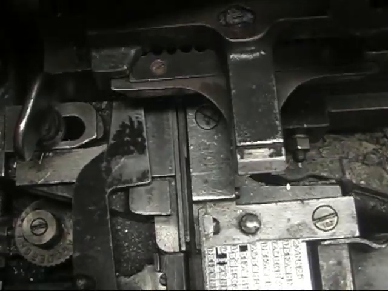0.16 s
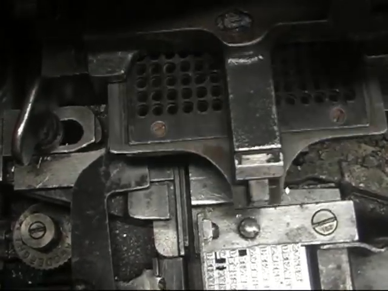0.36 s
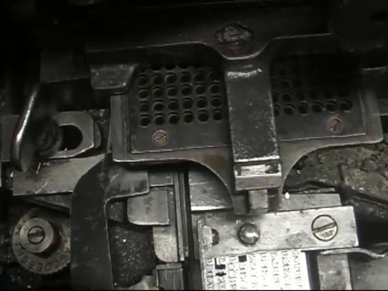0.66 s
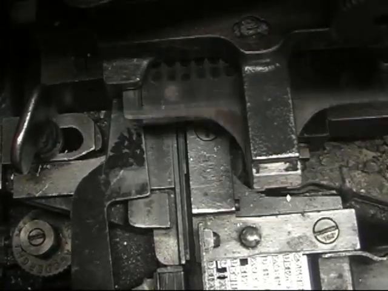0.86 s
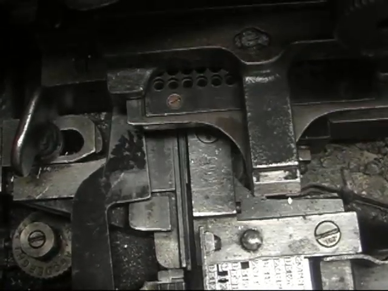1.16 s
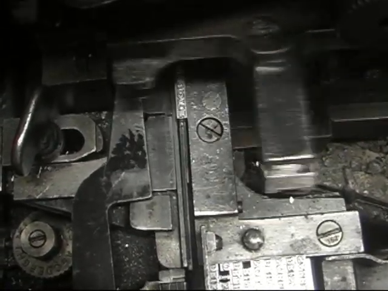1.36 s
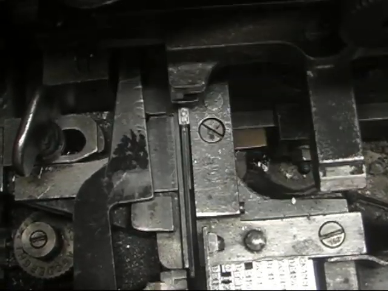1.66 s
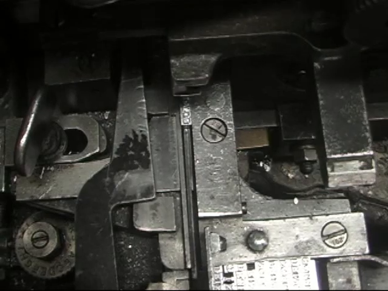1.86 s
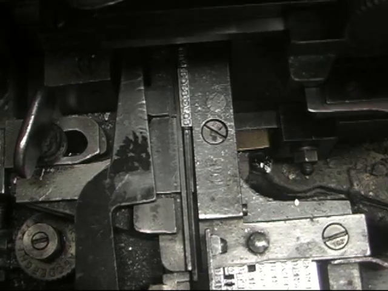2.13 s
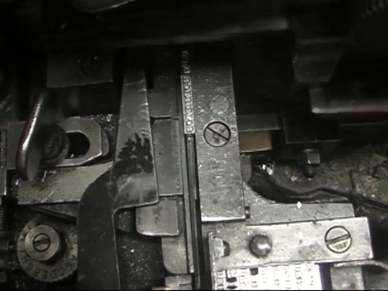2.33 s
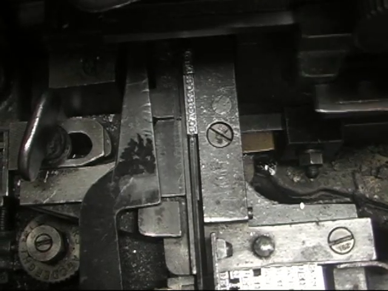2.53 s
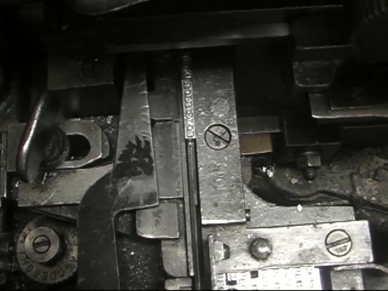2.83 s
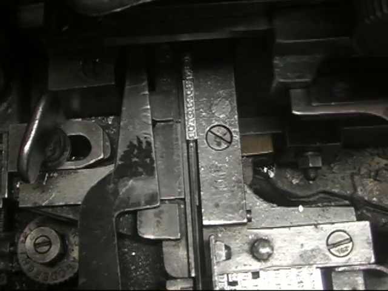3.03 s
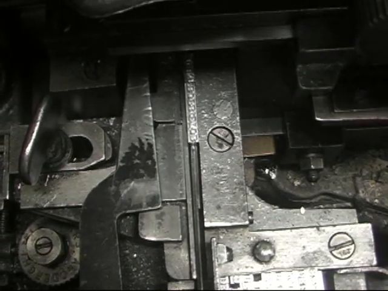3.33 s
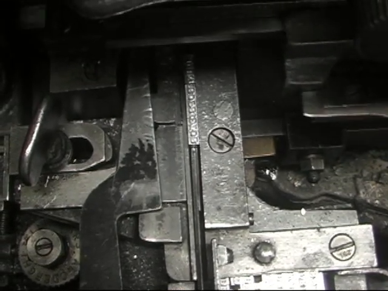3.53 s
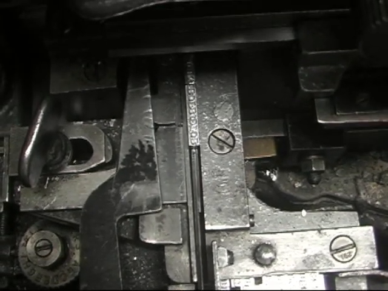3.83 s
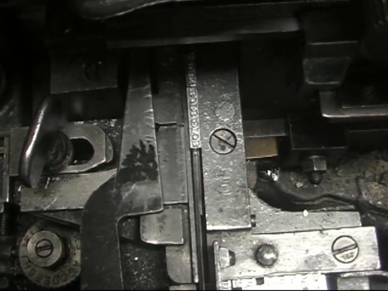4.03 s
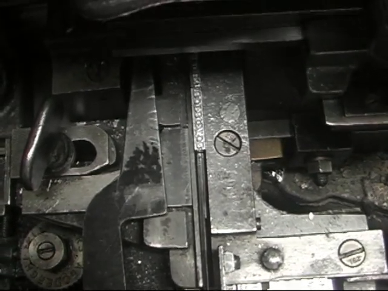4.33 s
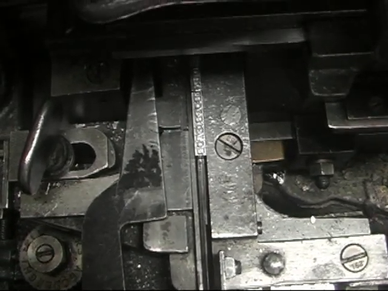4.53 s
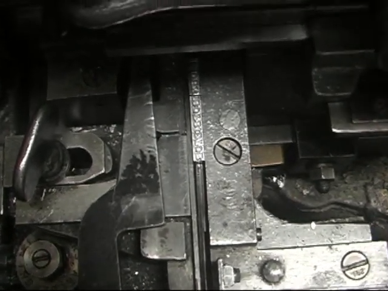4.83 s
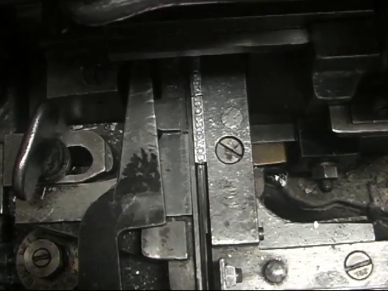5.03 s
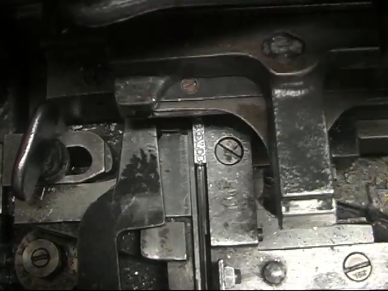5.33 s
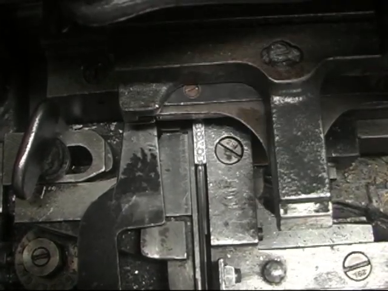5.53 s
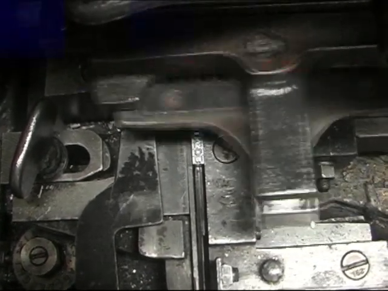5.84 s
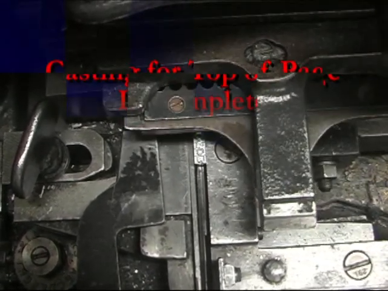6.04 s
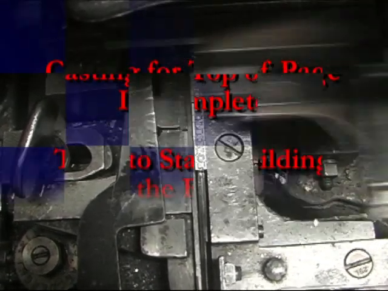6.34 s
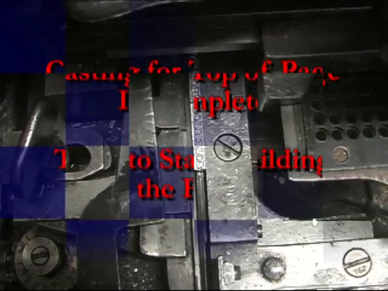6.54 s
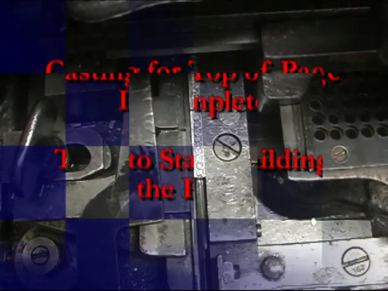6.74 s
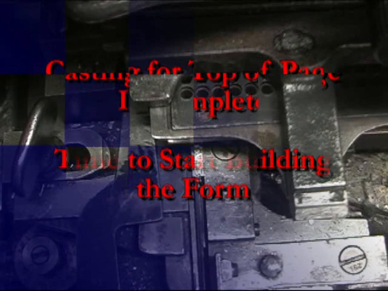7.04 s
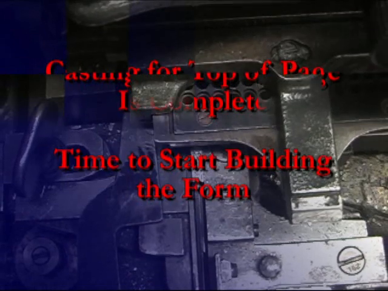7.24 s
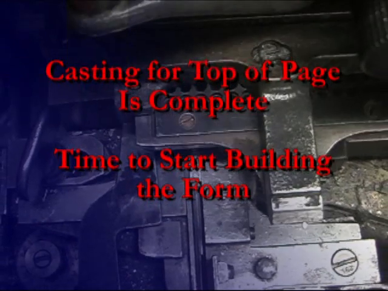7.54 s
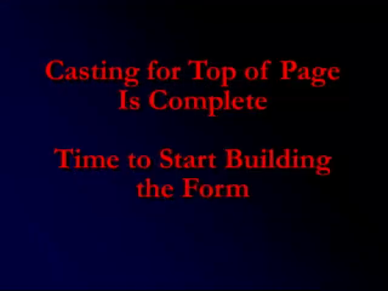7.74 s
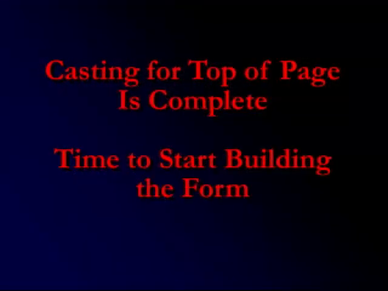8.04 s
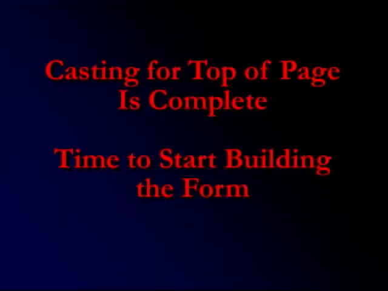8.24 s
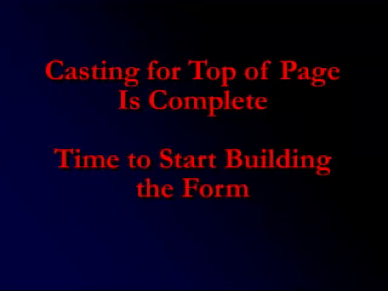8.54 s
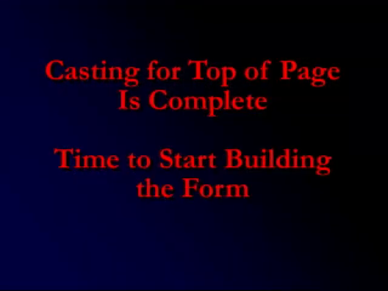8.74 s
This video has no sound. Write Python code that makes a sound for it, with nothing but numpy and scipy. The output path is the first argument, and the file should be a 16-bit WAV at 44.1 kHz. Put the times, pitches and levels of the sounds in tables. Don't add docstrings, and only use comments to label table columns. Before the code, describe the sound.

Close to a heavy type-casting machine, steel parts slam, clack and rebound in a fast repeating cycle, almost two per second. Loose springs and pins jingle between blows and gears whirr underneath. Early knocks are irregular, the middle is regular with sharp bright clicks, then knocking returns. The machine fades from about six seconds and stops, leaving only faint dry digital ticks.

```python
import sys
import numpy as np
from scipy import signal
from scipy.fft import rfft, irfft, next_fast_len
from scipy.io import wavfile

SR = 44100
rng = np.random.default_rng(int(sys.argv[2]) if len(sys.argv) > 2 else 0)


def gain_from_db(level_db):
    decades = np.asarray(level_db, float) / 20
    return 10 ** decades


def bounce(signal):
    frames = np.transpose(np.atleast_2d(signal))
    limited = np.clip(frames, -1, 1)
    pcm = np.round(limited * 32767).astype(np.int16)
    wavfile.write(sys.argv[1], SR, pcm)


N = 392045
CUT_S = 7.728

# pitch_hz, level_db (per Hz)
WHIRR_COLOUR = [(30, -49.5), (200, -13.5), (288, -2), (350, -6.5), (700, 3), (1400, -3), (4400, -9),
                (15000, -12)]
# pitch_hz, level_db (per Hz)
STEEL_COLOUR = [(100, -31.5), (700, -9.5), (1800, -3.5), (3000, -2.5), (4300, 1), (5300, -2.5),
                (8900, -1.5), (11000, -8), (13500, -2.5), (16000, -27.5)]
# case_seats_s, mould_slams_s, clamp_shuts_s, ejector_trips_s,
# case_travel (0 to 1)
CASTS = [(-.418, -.348, -.183, -.051, 1), (.129, .1959, .3564, .492, 1), (.672, .7404, .9069, 1.0391, 1),
         (1.2176, 1.2864, 1.4497, 1.5846, 1), (1.770, 1.8406, 2.0005, 2.135, 1),
         (2.3279, 2.398, 2.5634, 2.694, .05), (2.8832, 2.9534, 3.1186, 3.2482, .05),
         (3.4374, 3.5045, 3.6712, 3.8024, .05), (3.995, 4.0645, 4.2313, 4.361, .05),
         (4.547, 4.618, 4.7838, 4.916, .05), (5.0975, 5.1655, 5.3297, 5.462, 1),
         (5.6426, 5.714, 5.8713, 6.010, 1), (6.2056, 6.2711, 6.4256, 6.5685, 1),
         (6.754, 6.824, 6.9808, 7.121, 1), (7.3042, 7.3736, 7.5424, 7.6706, 1)]
# delay_ms (after the cam fires), level_db, closing_ms,
# chatter_ms, part_hz
CASE_SEATS = [
    (-.8, -4, .6, 3.6, 6800),
    (-.2, -10, .8, 4.0, 1500),
    (12.0, -17, 4.0, 9.0, 3300),
]
MOULD_SLAMS = [(-26.0, -8.5, .5, 1.8, 4250), (-12.5, -3, 2.6, 2.2, 7000), (0.01, -1.5, 1.6, 3.8, 8200),
               (12.0, -12, 1.5, 4.0, 6500), (64.0, -11, .6, 2.4, 9500), (101.0, -18, 1.2, 4.0, 3000),
               (110.0, -20, 1.2, 3.0, 1900), (120.0, -20, 1.2, 3.0, 2200), (129.0, -17, .6, 2.0, 8100),
               (137.0, -5.5, 1.2, 2.8, 2580), (205.0, -19, .6, 1.8, 9500), (213.5, -13, .7, 2.4, 2900),
               (260.0, -16, .6, 1.8, 10000)]
CLAMP_SHUTS = [
    (0.01, -3.5, 2.6, 5.0, 6200),
    (1.0, -12, 1.5, 5.0, 1150),
    (14.0, -9.5, 3.5, 4.0, 3600),
    (27.0, -11.5, 4.0, 4.5, 4500),
]
EJECTOR_TRIPS = [
    (-51.5, -11, .5, 2.2, 3500),
    (-24.5, -14.5, .5, 2.0, 8900),
    (-13.0, -12.5, .5, 1.5, 3550),
    (-.5, -8, .4, 1.6, 5000),
    (-.3, -5.5, .4, 1.8, 12500),
    (16.0, -11.5, 7.0, 5.0, 2250),
    (71.5, -7.5, 3.0, 5.0, 9000),
    (79.0, -17, 3.0, 4.0, 2200),
]
RESTING_CLICKS = [
    (-80.0, -20, 1.0, 4.0, 3000),
    (-45.0, -18, 2.0, 5.0, 1500),
    (-31.0, -17, .6, 1.8, 9000),
    (27.0, -4.5, .8, 2.6, 5600),
    (146.0, -2, 2.6, 1.5, 12000),
    (407.0, -14, .75, 3.0, 4300),
]
TRAVEL_THUDS = [
    (28.0, -11.5, 2.5, 6.0, 7500),
    (246.0, -12, .6, 2.4, 1300),
    (273.0, -14, .5, 1.8, 9500),
    (412.0, -19, 4.0, 10.0, 8000),
]
# start_s, level_db, part_hz
PIN_KNOCKS = [(.0654, -8, 7060), (.1012, -4, 4000), (.1583, -8.5, 1080), (.3208, -5, 9600),
              (.644, -3.5, 6500), (1.1619, -8.5, 7540), (1.2548, -4.5, 6420), (1.3568, -6.5, 8100),
              (1.3695, -11.5, 2880), (1.39, -7.5, 4400), (1.4192, -3, 12200), (1.7058, -8.5, 2040),
              (1.751, -7.5, 7340), (1.925, -5, 8910), (1.9364, -2.5, 5400), (1.968, -8, 8750),
              (5.011, -11, 1270), (5.0755, -2.5, 6240), (5.2224, -3.5, 9000), (5.2286, -5.5, 4740),
              (5.6162, -5, 6600), (5.6302, -5.5, 14300), (6.131, -9.5, 3810), (6.1774, -8, 1730),
              (6.3905, -5, 7900), (6.7186, -8.5, 6680), (6.7465, -5, 7450), (6.8784, -9, 8800),
              (7.272, -9.5, 7540), (7.492, -1.5, 8900)]
# start_s, level_db, chatter_ms, part_hz
JAW_GRINDS = [(.1082, -7, 6.3, 9600), (.872, -8, 3.5, 2540), (.8962, -8, 7.4, 4350), (1.147, -15, 8, 4480),
              (1.186, -9, 3, 4480), (1.192, -11, 11, 6500), (1.8, -13, 9, 2300), (2.016, -11, 4.7, 5120),
              (5.0232, -13.5, 5, 4050), (5.601, -11, 2.2, 4000), (5.8784, -4, 4.7, 4300),
              (6.9196, -8.5, 3, 7000), (6.9875, -7.5, 9, 9350), (7.284, -8, 6.7, 6550)]
# start_s, level_db
CASE_STRIKES = [
    (.101, -1),
    (.667, -7.5),
    (1.214, -9),
    (5.088, -5),
    (5.64, -7),
    (6.174, -11),
]
# start_s, level_db, pitch_hz
TYPE_DROPS = [
    (.505, -19, 7150),
    (1.056, -15, 7110),
    (1.06, -22, 11800),
    (1.192, -19, 7050),
    (4.932, -20, 9400),
    (4.948, -20, 11850),
    (6.586, -20, 7100),
]
# start_s, level_db
PUMP_STRIKES = [
    (3.117, -18.5),
    (3.67, -26),
    (5.33, -22),
    (5.88, -26),
]
# time_s, level_db
FADE = [
    (5.9, -1),
    (6.5, -4.5),
    (7, -8),
    (7.4, -15.5),
    (7.68, -32),
    (7.728, -53),
]
STEPS_DOWN = [7.8827, 7.9134, 7.95, 7.9781, 8.0619, 8.0861, 8.1912, 8.226, 8.2705, 8.2744, 8.3504, 8.4378,
              8.4692, 8.5357, 8.5378, 8.6401, 8.6508, 8.6737, 8.7191, 8.7216, 8.7399, 8.7891, 8.7913,
              8.8235, 8.8386, 8.8411, 8.8493, 8.8582, 8.8722, 8.8883]
STEPS_UP = [7.8808, 8.117, 8.2263, 8.2812, 8.3228, 8.328, 8.508, 8.6993, 8.7148, 8.8407, 8.8667]

TRAVEL_CLOSING_MS, TRAVEL_CHATTER_MS, TRAVEL_DB = 4.0, 5.0, -2.5
CLAMP_REBOUNDS_FROM_S = 1.2
SPREAD_DB, SPREAD_MS, SPREAD_OCTAVES = .7, .5, .07
BRIGHT_DB, BRIGHT_PER_OCTAVE_DB, SOFT_DULL_DB = 1.0, 5.5, 3.0
LEAD_S = .016
LEVER_HZ, LEVER_WIDTH_HZ = 2600, 150


def rms_one(x):
    return x / np.sqrt(np.mean(x ** 2) + 1e-20)


def colour(x, points):
    size = next_fast_len(N + 4096)
    hz, db = np.transpose(points)
    bins = np.log(np.fft.rfftfreq(4096, 1 / SR) + 1)
    log_gain = np.interp(bins, np.log(hz), db) * np.log(10) / 20
    cepstrum = irfft(log_gain)
    cepstrum[1:2048] *= 2
    cepstrum[2049:] = 0
    impulse = irfft(np.exp(rfft(cepstrum)))
    return irfft(rfft(x, size) * rfft(impulse, size), size)[:N]


def ring(x, hz, t60):
    r = gain_from_db(-60 / (t60 * SR))
    w = 2 * np.pi * min(hz, 19000) / SR
    return signal.lfilter([1 - r * r, 0, r * r - 1], [2, -4 * r * np.cos(w), 2 * r * r], x)


def add(track, sound, s):
    at = max(round(s * SR), 0)
    track[at:at + len(sound)] += sound[:N - at]


def gear_whirr():
    return gain_from_db(-33.3) * rms_one(colour(rng.standard_normal(N), WHIRR_COLOUR))


def cam_contacts():
    rows = []
    for seat_s, slam_s, clamp_s, trip_s, travel in CASTS:
        seat = [(ms, db + TRAVEL_DB * travel, closing + TRAVEL_CLOSING_MS * travel,
                 chatter + TRAVEL_CHATTER_MS * travel, hz)
                for ms, db, closing, chatter, hz in CASE_SEATS]
        slam = [*MOULD_SLAMS, *(TRAVEL_THUDS if travel > .5 else RESTING_CLICKS)]
        clamp = CLAMP_SHUTS if clamp_s > CLAMP_REBOUNDS_FROM_S else CLAMP_SHUTS[:2]
        for s, table in ((seat_s, seat), (slam_s, slam), (clamp_s, clamp), (trip_s, EJECTOR_TRIPS)):
            rows += [(s + ms / 1000, *rest) for ms, *rest in table]
    rows = np.array(rows)
    stray = rng.standard_normal((len(rows), 3))
    not_lever = abs(rows[:, 4] - LEVER_HZ) > LEVER_WIDTH_HZ
    rows[:, 0] += stray[:, 0] * SPREAD_MS / 1000
    rows[:, 1] += stray[:, 1] * SPREAD_DB
    rows[:, 4] *= 2 ** (stray[:, 2] * SPREAD_OCTAVES * not_lever)
    return rows


def contact(closing_ms, chatter_ms, part_hz, bright_db, part_db, draw):
    ms = np.arange(len(draw)) / SR * 1000 - 1000 * LEAD_S
    swell, settle = ms / max(closing_ms, .05), -ms / max(chatter_ms, .3)
    envelope = np.exp(np.where(ms < 0, swell, settle))
    envelope *= np.minimum(1 + ms / 16, 1)
    bounces = gain_from_db(4.5 * np.repeat(draw[::50, 1], 50) * (abs(ms) > 1))
    force = envelope * bounces * draw[:, 0]

    low = signal.lfilter([.45], [1, -.55], force)
    crack = low * gain_from_db(-.7 * bright_db) + (force - low) * gain_from_db(0.35 * bright_db)

    lever = abs(part_hz - LEVER_HZ) < LEVER_WIDTH_HZ
    part = gain_from_db(part_db + 13.0 * lever) * ring(force, part_hz, (69.0 + 15 * lever) / part_hz)
    part = part * (5500 / part_hz) ** 0.78
    for ratio in gain_from_db(6 + 3 * draw[:2, 1]):
        overtone_hz = part_hz * ratio
        part = part + gain_from_db(part_db - 2.5) * ring(force, overtone_hz, 80.0 / overtone_hz)
    both = crack + part
    return both / np.sqrt(np.mean(both ** 2) / np.mean(envelope ** 2))


def clatter():
    knocks = [(s - .0005, db, .4, 2.2, hz) for s, db, hz in PIN_KNOCKS]
    grinds = [(s, db, .55 * ms, ms, hz) for s, db, ms, hz in JAW_GRINDS]
    rows = [*cam_contacts(), *knocks, *grinds]
    draws = rng.standard_normal((len(rows), 2800, 2))
    out = np.zeros(N)
    for (s, db, closing, chatter, hz), draw in zip(rows, draws):
        bright = BRIGHT_DB + BRIGHT_PER_OCTAVE_DB * np.log2(hz / 5500)
        bright -= SOFT_DULL_DB * np.log2(max(closing, 2.5) / 2.5)
        part_db = 6.0 + 5.5 * np.exp(-closing / 1.5)
        if LEAD_S < s < CUT_S:
            blow = contact(closing, chatter, hz, bright, part_db, draw)
            add(out, gain_from_db(db - 1.3) * blow, s - LEAD_S)
    return out


def loose_parts(hits, per_s, level_db):
    shaken = signal.lfilter([1], [1, -np.exp(-1 / (0.06 * SR))], hits ** 2)
    sizes = gain_from_db(5.0 * np.minimum(rng.exponential(1, N), 2.3))
    sizes = sizes * (rng.random(N) < per_s / SR)
    dealt = rng.integers(0, 10, N)
    white = rng.standard_normal(N)
    out = 0
    for k, hz in enumerate(np.geomspace(1300, 14000, 10)):
        taps = sizes * (dealt == k) + 1e-18
        puff = white * signal.lfilter([1], [1, -np.exp(-1 / (.0015 * SR))], taps)
        out = out + rms_one(ring(puff, hz, 9.0 / hz)) + .5 * rms_one(puff)
    return gain_from_db(level_db) * rms_one(out * (.1 + shaken / np.mean(shaken)) ** .3)


def frame_and_room(x, frame_s, frame_db, room_s, room_db, dulling):
    edges = np.geomspace(120, 16500, 16)
    white = rng.standard_normal((2, N))
    out = 0
    for k, (low, high) in enumerate(zip(edges, edges[1:])):
        band = signal.butter(2, [low, high], "band", fs=SR, output="sos")
        power = signal.sosfilt(band, x) ** 2
        energy = 0
        for t60, db in ((frame_s, frame_db), (room_s, room_db)):
            r = gain_from_db(-120 / (t60 * (low / 3000) ** -dulling * SR))
            energy = energy + gain_from_db(2 * db) * signal.lfilter([1 - r], [1, -r], power)
        out = out + np.sqrt(np.maximum(energy, 0)) * rms_one(signal.sosfilt(band, white[k % 2]))
    return out


def pitched(strikes, hz, t60):
    s = np.arange(6000) / SR
    tone = gain_from_db(-60 * s / t60) * (1 - np.exp(-s / .001)) * np.sin(2 * np.pi * hz * s)
    out = np.zeros(N)
    for at, db in strikes:
        add(out, gain_from_db(db) * tone, at)
        add(out, gain_from_db(db - 9) * tone, at + .021)
    return out


def case_rings():
    return pitched(CASE_STRIKES, hz=1965, t60=.05)


def bed_thumps():
    slams = [(cast[1], -49) for cast in CASTS[1:]]
    clamps = [(cast[2], -44) for cast in CASTS[1:]]
    return pitched(slams + clamps, hz=80, t60=.06)


def type_drops():
    return sum(pitched([(s, db)], hz, t60=.07) for s, db, hz in TYPE_DROPS)


def pump_rings():
    return pitched(PUMP_STRIKES, hz=990, t60=.12)


def idle_track():
    s = np.arange(N) / SR - CUT_S
    slots = rng.random(N // 4 + 1)
    chance = (np.exp(-s / .008) + .05 * np.exp(-s / .09)) * (s > 0) * (s < .128)
    low = np.repeat(slots, 4)[:N] < chance
    steps = low / -4.0
    steps[np.round(np.array(STEPS_DOWN) * SR).astype(int) - 3] = -1
    steps[np.round(np.array(STEPS_UP) * SR).astype(int) - 3] = 1
    smooth = np.convolve(steps, 4 * signal.firwin(31, 5400, fs=SR))[12:N + 12]
    gain = gain_from_db(-40.5 + 7.7 * np.exp(-np.maximum(s, 0) / 0.38))
    return signal.sosfilt(signal.butter(2, 22, "high", fs=SR, output="sos"), gain * smooth)


def scene():
    whirr = gear_whirr()
    hits = clatter()
    steel = colour(hits + loose_parts(hits, per_s=300, level_db=-31), STEEL_COLOUR)
    steel *= np.std(hits) / np.std(steel)
    steel += case_rings() + bed_thumps() + type_drops() + pump_rings()
    echoes = frame_and_room(steel, frame_s=0.095, frame_db=-4.2, room_s=0.5, room_db=-17.5, dulling=0.27)
    return (steel + echoes + whirr)[None]


def low_pass(x):
    return signal.sosfilt(signal.butter(12, 16440, fs=SR, output="sos"), x)


def record(dry):
    x = signal.sosfilt(signal.ellip(10, .5, 70, 15900, fs=SR, output="sos"), dry)
    low_band = signal.butter(2, [25, 160], "band", fs=SR, output="sos")
    thump = signal.sosfilt(low_band, x ** 2)
    s = np.arange(N) / SR
    fade = gain_from_db(np.interp(s, *np.transpose(FADE))) * (np.arange(N) < CUT_S * SR)
    machine = np.clip((x + gain_from_db(-36) * thump) * fade, -1, 1)
    return low_pass(machine + idle_track())


dry = scene()
out = record(dry)
bounce(out)
```